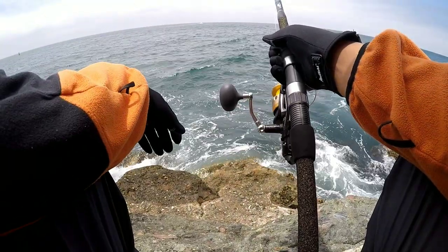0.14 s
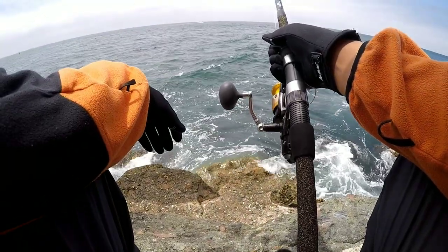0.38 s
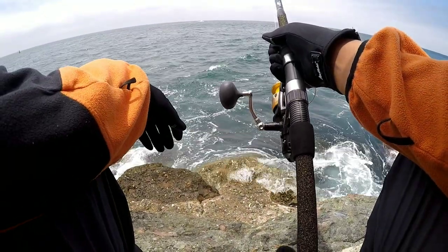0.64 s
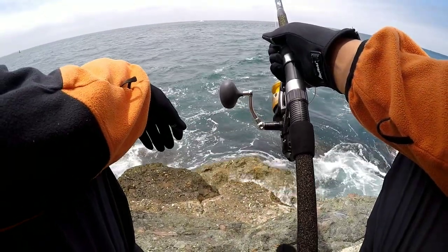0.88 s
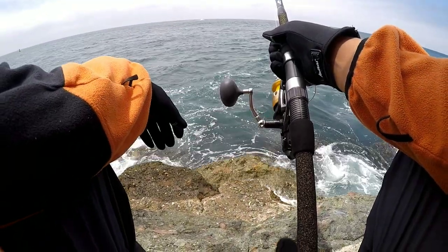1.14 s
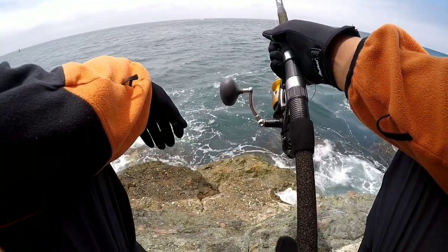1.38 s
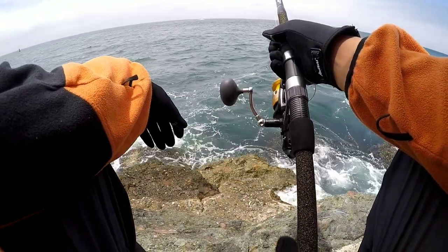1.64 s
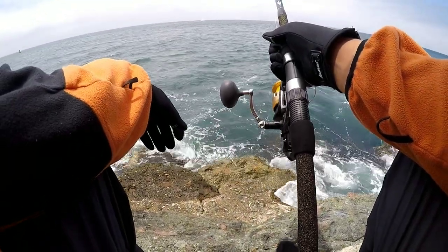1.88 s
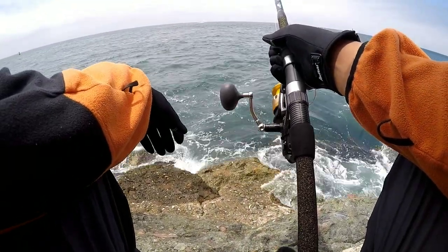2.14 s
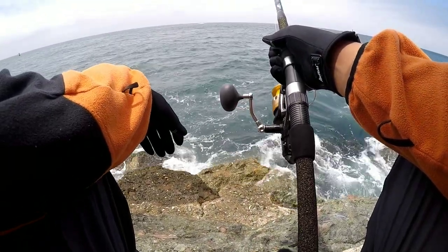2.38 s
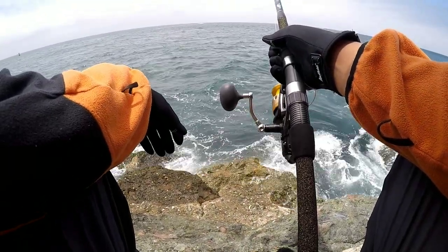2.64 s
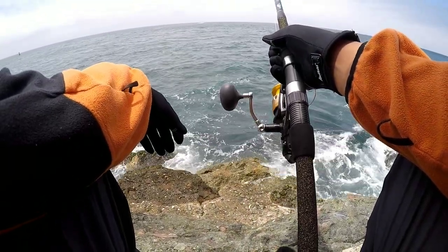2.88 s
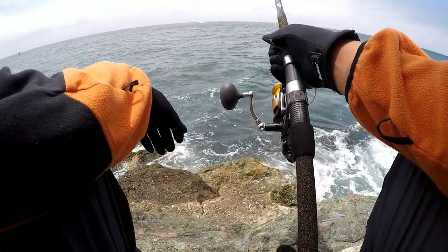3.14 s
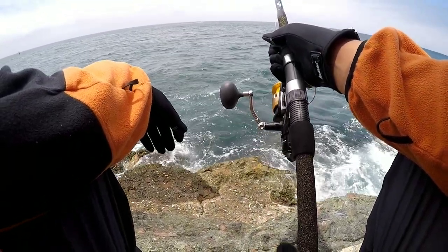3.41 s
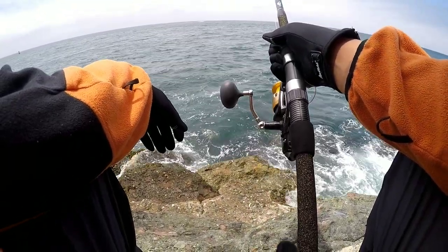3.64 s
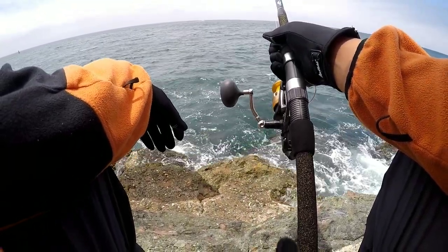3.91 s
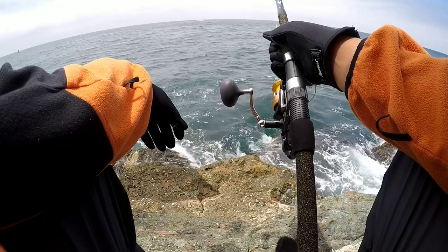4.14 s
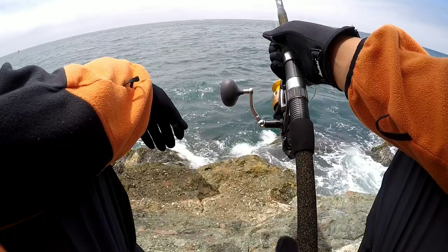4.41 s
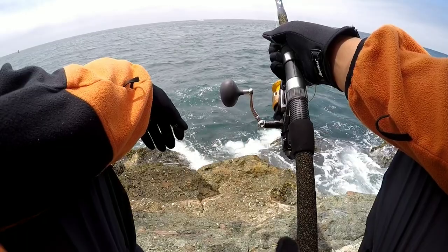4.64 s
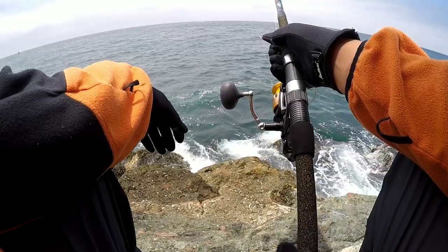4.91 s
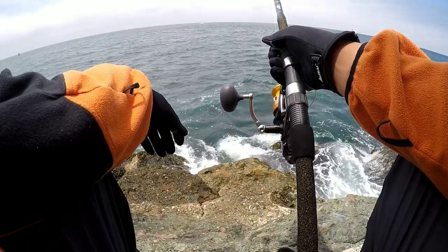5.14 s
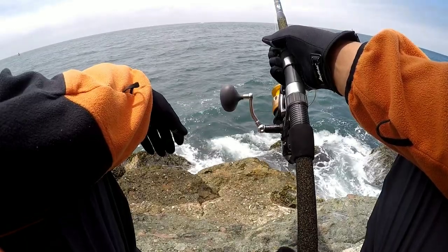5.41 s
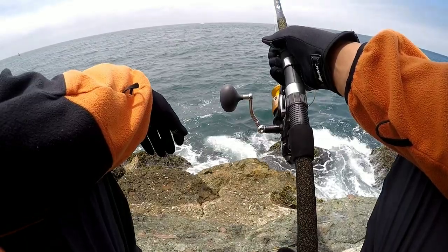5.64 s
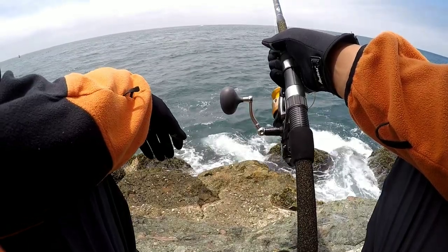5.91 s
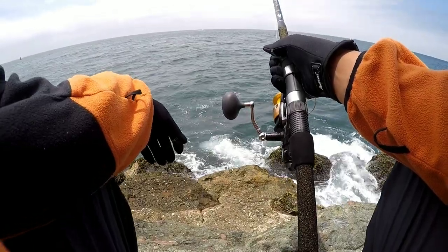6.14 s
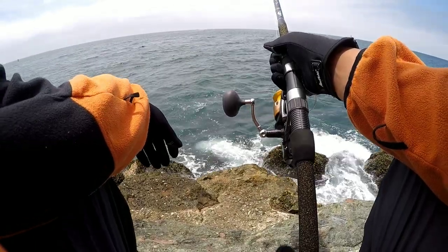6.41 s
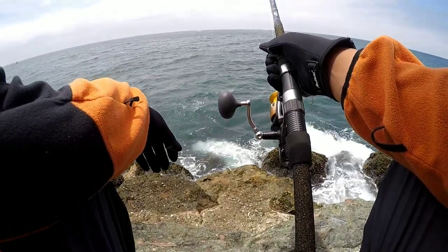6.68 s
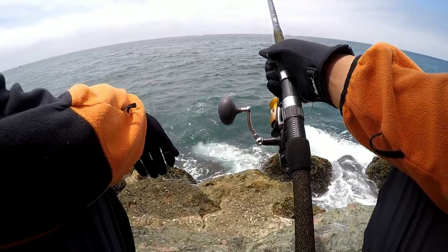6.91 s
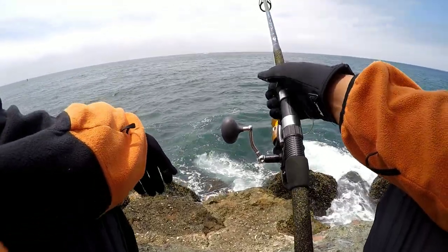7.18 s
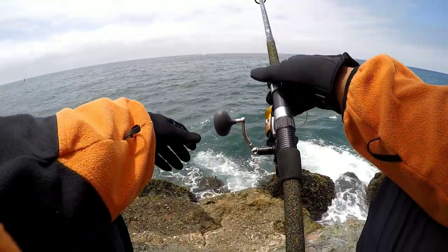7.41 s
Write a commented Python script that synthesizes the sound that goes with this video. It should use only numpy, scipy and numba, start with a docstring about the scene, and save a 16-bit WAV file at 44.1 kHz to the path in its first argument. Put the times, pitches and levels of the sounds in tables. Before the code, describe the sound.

From the start, deep wind rumble and quick low flutter buffet a close, enclosed microphone in irregular gusts, with early bumps through the first three seconds. Beneath them a rocky shore churns steadily: low boom, broad wash, bubbling foam and soft hiss, with a faint wavering far hum. Small waves break around 0.8 and 1.25 s; a fuller one swells at 2.1 s with wet splashes and low gulps, and another burst follows at 2.7 s. It eases near 3.3 s, then a big bright, foamy breaker rises at 4.3-4.6 s and drains. From 5 s the foam thins and hollow, sagging gulps come more often. Wind strengthens after 6 s. At about 6.47 and 6.62 s a reel gives two dry, sharp metallic ticks, very near. Blunt wind thumps cluster from 6.45 to 6.85 s and again around 7.15-7.35 s, with rumble and surf continuing to the end at 7.5 s.

```python
"""Wind buffets a microphone port on a rocky shore while swell booms, washes, foams and hisses over the rocks.
Wind is coloured noise pushed by gusts; the sea is noise and bursting bubbles moved by waves, band by band.
Droplets puff, hollows gulp low gliding tones, and single eddies thump the port late on.
A faint far hum wavers underneath, and a reel ticks twice close by as a cluster of short ringing modes."""
import sys
import numpy as np
from scipy import signal
from scipy.fft import rfft, irfft, next_fast_len
from scipy.io import wavfile
from scipy.ndimage import uniform_filter1d
from numba import njit

SR = 44100
rng = np.random.default_rng(int(sys.argv[2]) if len(sys.argv) > 2 else 0)


def field_ratio(decibels):
    """Amplitude ratio for a level in dB (20 dB per decade); scalars and array-likes work."""
    return 10 ** (np.asarray(decibels, dtype=float) / 20)


def store_wav(level_fs):
    """Save 16-bit WAV to argv[1]."""
    pcm = np.round(np.clip(np.atleast_2d(level_fs), -1, 1) * 32767)
    wavfile.write(sys.argv[1], SR, pcm.T.astype(np.int16))


N = 332514  # samples


def colour(x, points):
    """Shape a spectrum by (f/Hz, level/dB) points, silent outside them, and bring it to rms 1."""
    hz, db = np.transpose(points)
    size = next_fast_len(len(x))
    f = np.maximum(np.arange(size // 2 + 1) * SR / size, 1)
    gain = field_ratio(np.interp(np.log(f), np.log(hz), db, -120, -120))
    y = irfft(rfft(x, size) * gain, size)[:len(x)]
    return y / y.std()


def columns(table):
    """Draw each column of a time curve as one value per sample."""
    s, *rest = np.transpose(table)
    return [np.interp(np.arange(N) / SR, s, c) for c in rest]


def walk(rate):
    """Random levels held for 1 / rate seconds and smoothed twice; spread 1."""
    hold = int(SR / rate)
    steps = np.repeat(rng.standard_normal(N // hold + 1), hold)
    w = uniform_filter1d(uniform_filter1d(steps, hold), hold)[:N]
    return w / w.std()


@njit
def ring(out, start, hz, t60, glide, size):
    """Add decaying tones whose pitch is multiplied by glide on each sample."""
    for j in range(len(start)):
        w, a, phase = 2 * np.pi * hz[j] / SR, size[j], 0.
        fade = np.exp(-np.log(1000) / (t60[j] * SR))
        for i in range(start[j], min(len(out), start[j] + int(t60[j] * SR))):
            out[i] += a * np.sin(phase)
            phase += w
            w *= glide[j]
            a *= fade
    return out


def eddies(points, settle_s):
    """Turbulent pressure noise, its strength evened out over settle_s so that the wind curves set it."""
    x = colour(rng.standard_normal(N), points)
    span = int(settle_s * SR)
    return x / np.sqrt(uniform_filter1d(uniform_filter1d(x ** 2, span), span))


def gusts():
    """Each gust bends the buffet and flutter levels by a short bell in dB, mostly upwards."""
    # sudden gusts against the steady wind: t/s, buffet change/dB, flutter change/dB
    gust_rows = [(0.017, 8, 19), (0.26, 4.5, 12), (0.55, 1, 8), (0.64, 4.5, -2), (1.01, 12, 2),
                 (1.27, 12, 6), (1.53, 2, 4.5), (1.72, 2, 14.5), (1.84, 14, 11.5), (2.03, 3.5, -5),
                 (2.46, 11, 10), (2.76, 11, 5), (3.28, -0.5, 6), (3.57, 10, 1.5), (3.91, 4.5, -9),
                 (4.02, 4, 1), (4.7, 0, 4.5), (4.85, 3.5, -2), (5.04, 2, 8), (5.13, -5, 1), (5.24, 2, 0),
                 (5.71, 3.5, 9.5), (5.92, -1, 5), (6.4, 6, 0), (7.05, 9, -1.5), (7.46, 1.5, -0.5)]
    spread_s = 0.023  # standard deviation of the bell
    s, *rise_db = np.transpose(gust_rows)
    t = np.arange(0, N, 32) / SR
    bell = np.exp(-((t - s[:, None]) / spread_s) ** 2 / 2)
    return np.array([np.interp(np.arange(N) / SR, t, db) for db in np.array(rise_db) @ bell])


def wind():
    """Large eddies buffet the port; smaller ones flutter on top and come in quicker puffs."""
    # steady wind on the port, before gusts: t/s, buffet level/dB, flutter level/dB
    steady = [(0.0, -21, -33), (0.7, -18, -23.5), (1.2, -21, -26.5), (1.6, -21.5, -27), (1.9, -25.5, -29),
              (2.05, -18, -29), (2.55, -23, -31), (3.15, -20, -29.5), (3.5, -18.5, -25), (3.95, -22, -25),
              (4.2, -15, -23), (4.75, -19, -26.5), (4.9, -18.5, -32), (5.5, -18.5, -22),
              (5.85, -17.5, -24.5), (6.1, -17.5, -18), (6.7, -16.5, -20), (6.92, -22, -19.5),
              (7.15, -16.5, -16.5), (7.54, -15.5, -23)]
    # spectrum of the large eddies: f/Hz, relative level per Hz/dB
    buffet_colour = [(7.1, -42), (12, 0), (37, 8), (70, -4), (91, -33), (150, -120)]
    # spectrum of the small eddies: f/Hz, relative level per Hz/dB
    flutter_colour = [(32, -37), (55, -1.5), (133, -9), (172, -16), (220, -17.5), (290, -34), (480, -120)]
    buffet_db, flutter_db = np.array(columns(steady)) + gusts()
    buffet = field_ratio(buffet_db + 0.82 * walk(12)) * eddies(buffet_colour, settle_s=0.11)
    flutter = field_ratio(flutter_db + 1.7 * walk(14)) * eddies(flutter_colour, settle_s=0.19)
    return buffet + flutter


def bubbles(count, low_hz, high_hz, cycles, scatter_db):
    """Bursting bubbles: short tones that glide up a little; a few are much louder."""
    when, pitch, big = rng.random((count, 3)).T
    hz = low_hz * (high_hz / low_hz) ** pitch
    t60 = cycles / hz
    size = field_ratio(-scatter_db * np.log(1.002 - big)) * hz / low_hz  # equal energy per Hz
    glide = 1.18 ** (1 / (t60 * SR))
    out = ring(np.zeros(N), (when * N).astype(np.int64), hz, t60, glide, size)
    return out / out.std()


def surge(hz):
    """Level/dB at one pitch: waves swell as a bell, drain away and add their power to the backwash."""
    # waves that break on the rocks: crest t/s, rise time/s, fall time/s,
    # then relative boom, wash, foam, hiss and spray level/dB
    wave_rows = [(0.2, 0.65, 0.36, -1, 0, -3.5, -3.5, 0), (0.78, 0.26, 0.17, -4, 0.5, 3.5, 3.5, 3),
                 (1.0, 0.17, .18, -3, 4, 3, -2, -8), (1.25, 0.14, 0.066, 1.5, 1, 7.5, 1.5, -1),
                 (1.92, 0.09, 0.11, -4.5, -9.5, 4, 2.5, 0), (2.15, 0.16, 0.3, 4.5, 4, 6, 5.5, 3.5),
                 (2.55, .08, .1, -14, -1, -3, -9, 3), (2.7, 0.096, 0.1, 2.5, 4, 7.5, 2, 6),
                 (2.82, .07, 0.075, -4.5, -2, -4.5, -1.5, 3.5), (3.6, 0.04, 0.1, 1.5, -1, -4, -7, -1.5),
                 (4.06, 0.049, 0.13, -1.5, 0, 0.5, 0, -8.5), (4.36, 0.19, 0.14, 1, 5, 7.5, 9, -1),
                 (4.5, 0.064, 0.18, 2.5, 4, 6.5, 3, 0.5), (4.95, 0.15, 0.43, -1, -1.5, 2.5, 1.5, -2.5),
                 (5.36, 0.11, 0.65, 3, 0.5, -1, -4.5, 0.5), (5.7, 0.15, 0.25, 2.5, -3.5, -8, -8, -5.5),
                 (6.0, .1, 0.27, -2.5, -2, -5.5, -2.5, -3), (6.48, 0.19, 0.23, 3.5, 4, -2.5, -2.5, -2),
                 (6.97, 0.19, 0.28, 3.5, -1, -4, -6, -9.5), (7.3, 0.052, 0.091, 1, 0.5, -8, 4.5, -2)]
    # backwash between the waves: t/s, then relative boom, wash, foam, hiss and spray level/dB
    backwash = [(0.0, 3, -2, 3, 2.5, 0), (1.6, -0.4, 0.5, 5, 4, 0.5), (3.3, -1.3, 0.5, 2, 0.5, 0),
                (3.9, 1.9, 1, 5.5, 3, 0.84), (5.7, 1.9, 5, 0.5, 1, 0), (6.9, 4.5, 1, -1, -2.5, -1),
                (7.54, 0.3, 1.5, -5, -0.5, -2)]
    # layer that rules each pitch: f/Hz, layer
    # (0 boom, 1 wash, 2 foam, 3 hiss, 4 spray; fractions blend two)
    layer_map = [(400, 0), (1000, 1), (2800, 2), (4500, 2.3), (8000, 3), (11000, 4)]
    # a dip between wash and foam that opens and fills again: t/s, level at its centre/dB
    dip_curve = [(0.0, 2), (1.4, -3), (1.8, -3), (2.5, 0.5), (3.0, 2), (4.5, -4), (5.3, 4), (6.0, 3.5),
                 (7.54, 5)]
    dip_hz, dip_octaves = 1800, 0.28
    t = np.arange(0, N, 64) / SR
    layer_hz, layer = np.transpose(layer_map)
    position = np.interp(np.log(hz), np.log(layer_hz), layer)
    share = np.clip(1 - abs(position - np.arange(5)), 0, 1)
    waves, back = np.array(wave_rows), np.array(backwash)

    crest, rise, fall = waves.T[:3, :, None]
    swell = ((t - crest) / rise) ** 2
    drain = (abs(t - crest) / fall) ** 1.33
    shape = np.exp(-np.where(t < crest, swell, drain))

    back_power = field_ratio(np.interp(t, back[:, 0], back[:, 1:] @ share)) ** 2
    power = back_power + field_ratio(waves[:, 3:] @ share) ** 2 @ shape
    dip_db = np.interp(t, *np.transpose(dip_curve)) * np.exp(-(np.log2(hz / dip_hz) / dip_octaves) ** 2)
    # only the movement around the mean power counts
    return np.interp(np.arange(N) / SR, t, 10 * np.log10(power / power.mean()) + dip_db)


def sea():
    """Noise and bubbles in half-octave bands: each follows the surge and flickers on its own."""
    # the sea through the case, whose cavity lifts some bands: f/Hz, relative level per Hz/dB
    sea_colour = [(100, -28), (170, -5.5), (350, 1), (480, -8), (750, -19), (1030, -17), (1250, -24.5),
                  (1750, -26.5), (2060, -28.5), (2450, -28), (2700, -26.5), (3000, -26.5), (3350, -34.5),
                  (4500, -38), (4850, -36), (5100, -37.5), (5400, -38), (5750, -42), (6600, -44.5),
                  (7700, -53), (9900, -75)]
    # spectrum of the fine spray: f/Hz, relative level per Hz/dB
    spray_colour = [(6500, -25), (7600, -5.5), (8800, -2.5), (10200, 0), (11500, -1), (13000, -1.5),
                    (15300, -5.5), (16500, -30)]
    large = bubbles(count=12000, low_hz=500, high_hz=8000, cycles=14, scatter_db=2.1)
    water = rng.standard_normal(N) + field_ratio(-10) * large
    fine = bubbles(count=4000, low_hz=7000, high_hz=15000, cycles=12, scatter_db=2.2)
    mist = rng.standard_normal(N) + field_ratio(-11) * fine
    body = rfft(colour(water, sea_colour) * field_ratio(-26) + colour(mist, spray_colour) * field_ratio(-66.5))
    octave = np.log2(np.maximum(np.arange(len(body)) * SR / N, 1))
    splash = walk(28)  # moves all the bands together
    out = 0
    for centre in np.arange(7, 14.5, .5):  # log2 of Hz
        band = irfft(body * np.clip(1 - 2 * abs(octave - centre), 0, 1), N)
        shared_db = 0.15 * max(centre - 8.5, 0)  # the treble splashes most
        lumps_db = 0.44 + 0.5 * max(9.5 - centre, 0)  # the bass comes in lumps
        fizz_db = 0.25 + 0.3 * max(centre - 12.5, 0)  # the top fizzes quickly
        flicker_db = shared_db * splash + lumps_db * walk(12) + fizz_db * walk(35) + 0.2 * walk(6)
        out = out + band * field_ratio(surge(2 ** centre) + flicker_db)
    return out


def valleys(x):
    """Deepen or fill narrow valleys in the colour of the sea over time."""
    # valleys: f/Hz, width/octaves, share of the change (applied to amplitude gain minus 1)
    valley_rows = [(1500, 0.078, 0.71), (2050, .07, 0.81), (3900, 0.091, 1.1), (4430, 0.079, .7),
                   (5100, .04, .6)]
    # they deepen under the big breaker and fill later: t/s, level at the centre of a full share/dB
    depth_curve = [(0.0, 0), (2.2, -2.3), (3.5, -1), (4.3, -6.5), (4.75, -4), (5.3, 0), (7.54, 2)]
    hz, width, share = np.array(valley_rows).T[:, :, None]
    octave = np.log2(np.maximum(np.arange(N // 2 + 1) * SR / N, 1) / hz)
    weight = (share * np.exp(-(octave / width) ** 2)).sum(axis=0)
    inside = irfft(rfft(x) * weight, N)
    return x + (field_ratio(columns(depth_curve)[0]) - 1) * inside


def hum():
    """A faint low tone from far off that wavers in pitch and level."""
    centre_hz, rms_db = 135.8, -37
    phase = 2 * np.pi * np.cumsum(centre_hz + 1.22 * walk(3)) / SR
    return np.sqrt(2) * field_ratio(rms_db + 0.93 * walk(2.7)) * np.sin(phase)


def puffs(table, points, fade_s):
    """Each row is a soft puff of coloured noise that decays with time constant fade_s."""
    kicks = np.zeros(N)
    s, db = np.transpose(table)
    kicks[(s * SR).astype(int)] = field_ratio(db)
    fade = signal.lfilter([1], [1, -np.exp(-1 / (fade_s * SR))], kicks)
    soft = uniform_filter1d(fade, size=64)  # blunts the start
    return soft * colour(rng.standard_normal(N), points)


def drops():
    """Droplets in the foam, finer specks in the spray and dense splashes, all as puffs of noise."""
    # droplets and slaps that stand out of the foam: t/s, puff level/dB
    drop_rows = [(0.6664, -46), (1.715, -46), (1.906, -42), (3.8821, -42)]
    # their spectrum: f/Hz, relative level per Hz/dB
    drop_colour = [(2500, -30), (3500, -17), (5000, 4), (7000, -10), (8500, -24), (15000, -32)]
    # fine specks that fizz in the top: t/s, puff level/dB
    speck_rows = [(1.355, -63), (1.997, -62), (2.105, -59), (2.69, -58), (2.815, -59), (3.474, -61),
                  (5.44, -60)]
    # their spectrum: f/Hz, relative level per Hz/dB
    speck_colour = [(8000, -30), (10000, -3), (12000, -1), (15000, 0), (16000, -28)]
    # dense wet splashes at the foot of a breaker: t/s, puff level/dB
    splash_rows = [(2.18, -34), (2.3, -34), (2.702, -36), (4.03, -38), (4.21, -37), (4.457, -30.5),
                   (4.5, -33), (4.62, -34), (5.987, -33)]
    # their spectrum: f/Hz, relative level per Hz/dB
    splash_colour = [(650, -27), (850, -2), (1030, 2), (1200, -5), (1600, -32)]
    droplets = puffs(drop_rows, drop_colour, fade_s=0.004)
    specks = puffs(speck_rows, speck_colour, fade_s=0.009)
    return droplets + specks + puffs(splash_rows, splash_colour, fade_s=0.02)


def slaps():
    """Water shuts air into hollows of the rock: each pocket gulps a low tone that sags, holds or rises."""
    # gulps: t/s, tone level before the band filter/dB, starting f/Hz,
    # length to -60 dB/cycles of the starting pitch, end pitch/start pitch
    slap_rows = [(2.055, -15, 344, 25, .88), (2.135, -16, 336, 50, 0.81), (2.075, -18, 310, 22, .88),
                 (2.228, -12, 258, 20, 1), (2.753, -18.5, 250, 20, 1), (3.331, -13.5, 344, 23, 0.79),
                 (3.564, -14, 303, 17, .88), (4.501, -19, 453, 24, 1), (4.45, -13, 330, 18, 1.1),
                 (4.985, -13, 277, 24, 0.8), (5.29, -9.5, 332, 30, 0.82), (5.33, -16, 297, 24, .88),
                 (5.535, -12.5, 333, 19, 0.8), (6.046, -10.5, 284, 19, .88), (6.342, -9.5, 240, 14, 0.73),
                 (6.477, -8.5, 230, 32, 9.15), (6.745, -8.5, 234, 14, .88), (6.972, -6.5, 282, 14, 0.75)]
    s, db, hz, cycles, glide = np.transpose(slap_rows)
    t60 = cycles / hz
    gulps = ring(np.zeros(N), (s * SR).astype(np.int64), hz, t60, glide ** (1 / (t60 * SR)), field_ratio(db))
    blunt = signal.butter(2, [170, 520], "band", fs=SR, output="sos")  # softens the start
    return signal.sosfilt(blunt, gulps)


def thumps():
    """Single eddies thump the port in the strongest wind: each is a blunt push and a swing back."""
    # thumps: t/s, tone level before the low-pass/dB, f/Hz
    thump_rows = [(6.452, -6.5, 110), (6.538, -10, 135), (6.649, -9, 120), (6.722, -7, 110),
                  (6.787, -7, 145), (6.854, -10, 115), (7.144, -9, 95), (7.245, -3, 120), (7.339, -14, 100)]
    s, db, hz = np.transpose(thump_rows)
    t60 = 4 / hz  # four cycles
    push = ring(np.zeros(N), (s * SR).astype(np.int64), hz, t60, np.ones(len(s)), field_ratio(db))
    return signal.sosfilt(signal.butter(2, 330, fs=SR, output="sos"), push)


def reel():
    """The pawl snaps, rings the modes of the reel body for a moment and bounces once, duller."""
    # modes of the reel: f/Hz, relative level/dB, t60/s
    mode_rows = [(1120, 0, .0083), (1570, -1.5, .011), (1860, -7, .011), (2480, 1, .0095),
                 (3020, -10.5, .0115), (4100, -8.5, .008), (4980, -9.5, .009), (5380, -14.5, .009),
                 (5960, -12.5, .010), (6700, -17, .008), (8800, -36, .004)]
    # ticks: t/s, peak of the snap/dB, extra brightness/dB per octave around 2 kHz
    tick_rows = [(6.4665, -14.5, -1.5), (6.6170, -13.2, -.5)]
    rebound_s, rebound_db, rebound_dull = .0031, -21, -4  # dull in dB per octave
    build_cycles = .6  # each mode swells for part of its own cycle, so the treble speaks first
    hz, db, t60 = np.array(mode_rows).T[:, :, None]
    t = np.arange(SR // 20) / SR
    build = 1 - np.exp(-(t * hz / build_cycles) ** 2)
    modes = np.sin(2 * np.pi * hz * t) * field_ratio(-60 * t / t60) * build
    modes[1::2] *= -1  # neighbouring modes swing in opposite directions
    out = np.zeros(N)
    for s, peak_db, bright_db in tick_rows:
        for late, soft_db, dull_db in ((0, 0, 0), (rebound_s, rebound_db, rebound_dull)):
            tilt_db = (bright_db + dull_db) * np.log2(hz / 2000)
            shape = (field_ratio(db + tilt_db) * modes).sum(axis=0)
            out[int((s + late) * SR):][:len(t)] += shape / abs(shape).max() * field_ratio(peak_db + soft_db)
    return out


def scene():
    """All sources meet at one port, in mono."""
    shore = wind() + valleys(sea()) + hum() + drops()
    return (shore + slaps() + thumps() + reel())[None]


def roll_off(x):
    """The treble ends steeply here."""
    return signal.sosfilt(signal.butter(12, 15300, fs=SR, output="sos"), x)


def record(dry):
    """Soft saturation rounds the loudest gusts a little."""
    mix = np.tanh(0.79 * dry) / 0.81
    return roll_off(mix)


dry = scene()
out = record(dry)
store_wav(out)
```